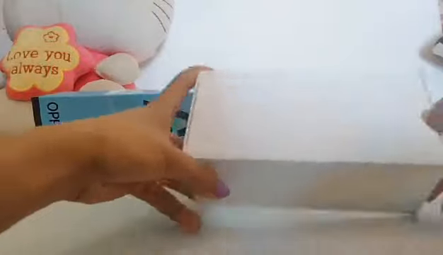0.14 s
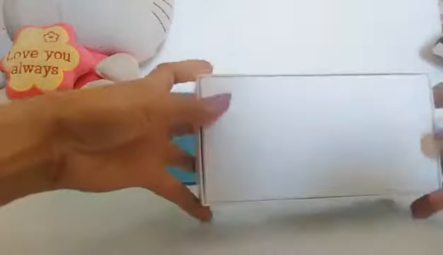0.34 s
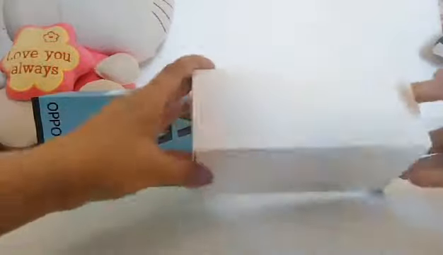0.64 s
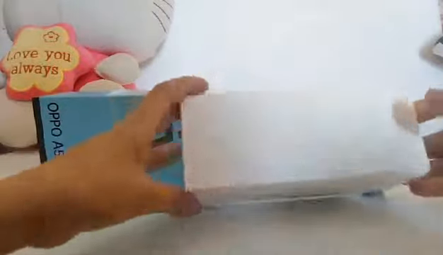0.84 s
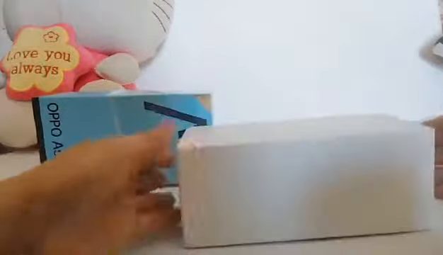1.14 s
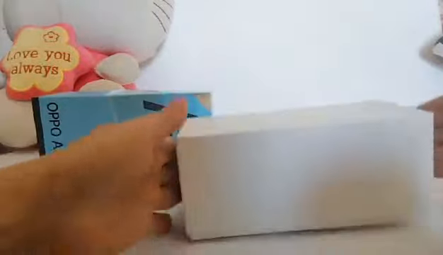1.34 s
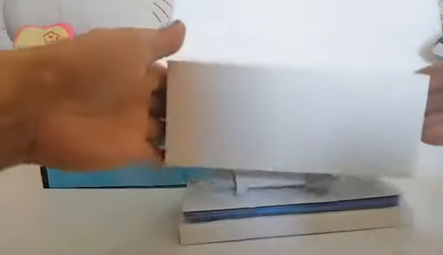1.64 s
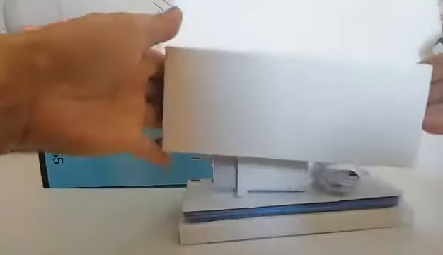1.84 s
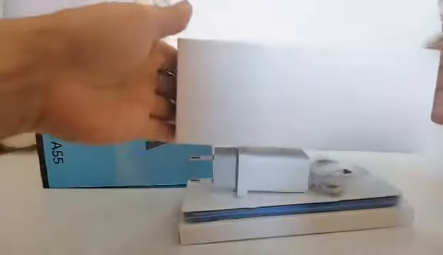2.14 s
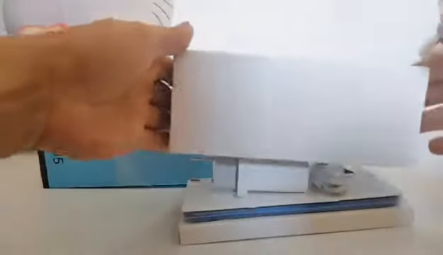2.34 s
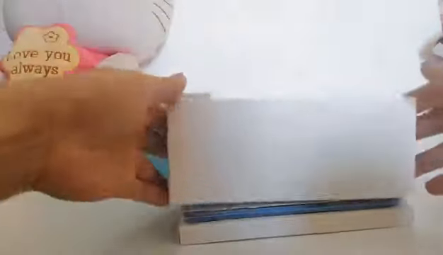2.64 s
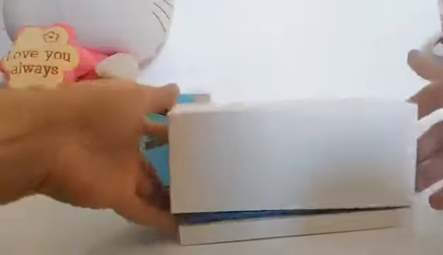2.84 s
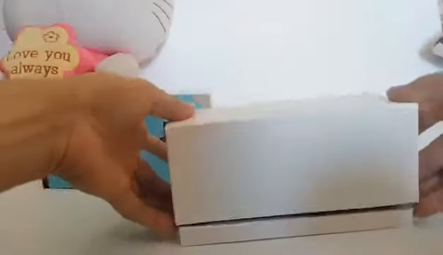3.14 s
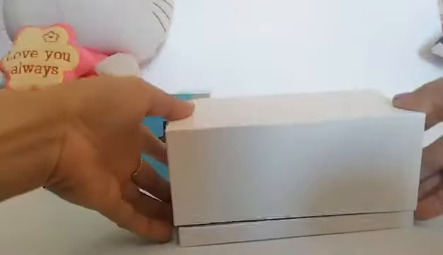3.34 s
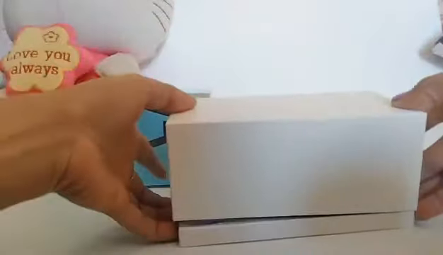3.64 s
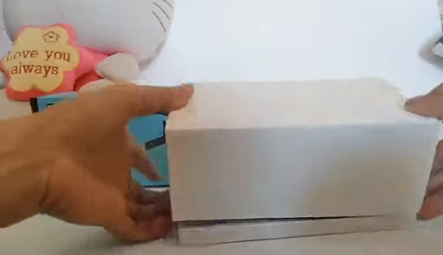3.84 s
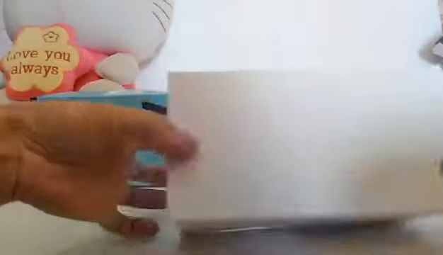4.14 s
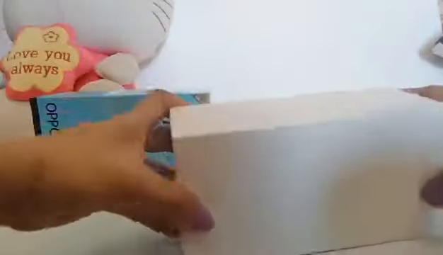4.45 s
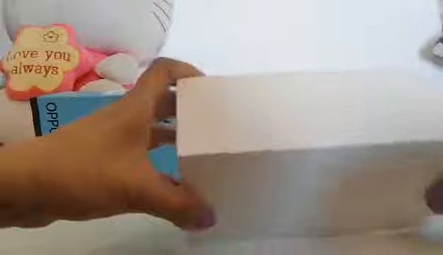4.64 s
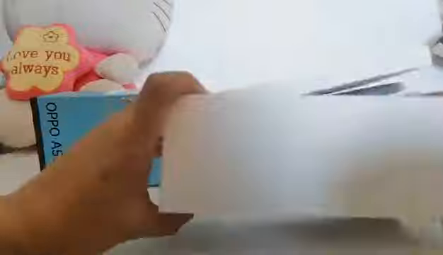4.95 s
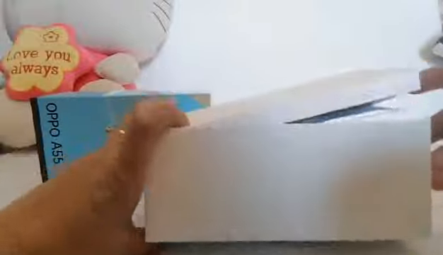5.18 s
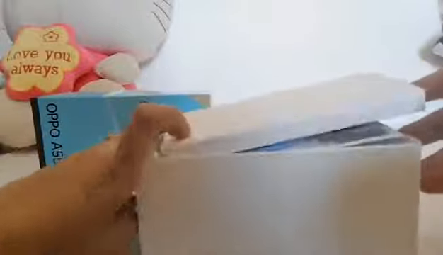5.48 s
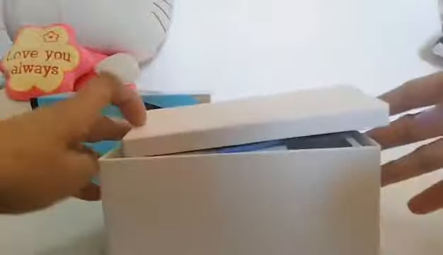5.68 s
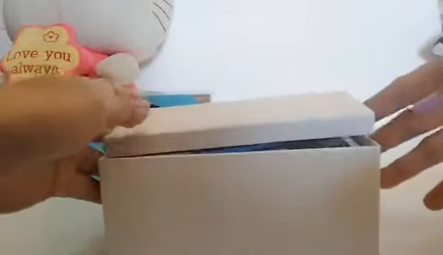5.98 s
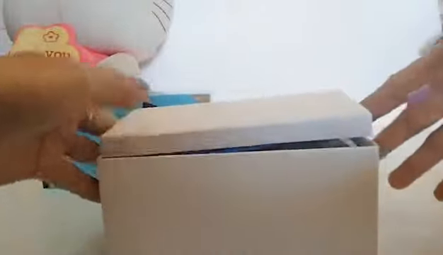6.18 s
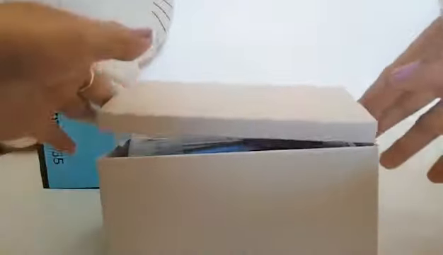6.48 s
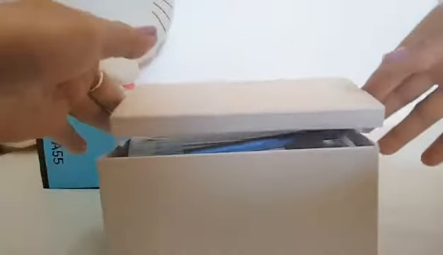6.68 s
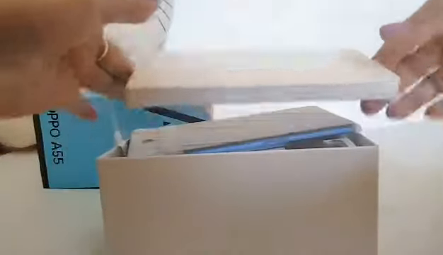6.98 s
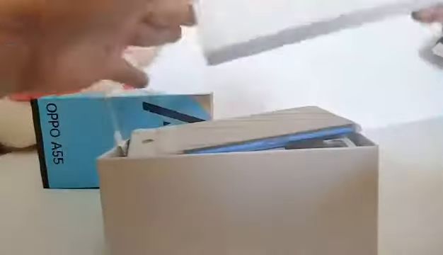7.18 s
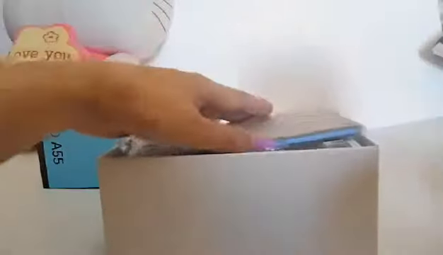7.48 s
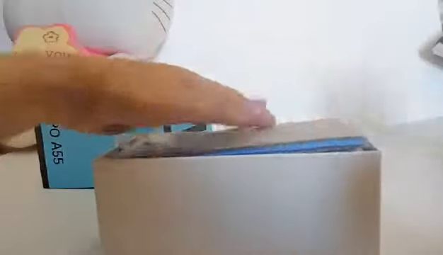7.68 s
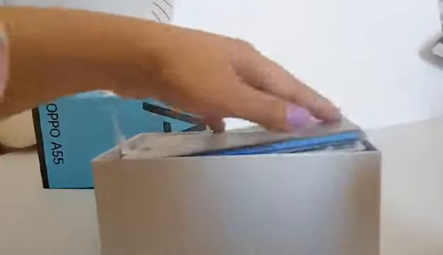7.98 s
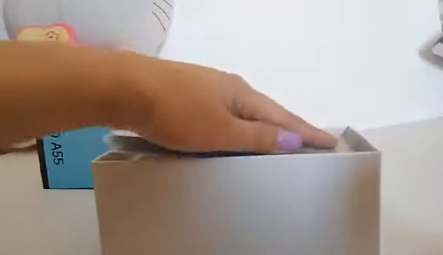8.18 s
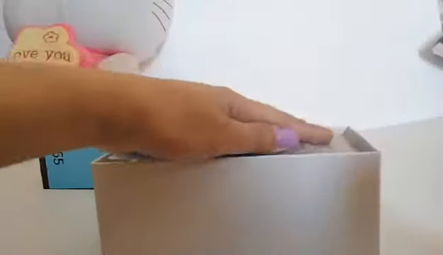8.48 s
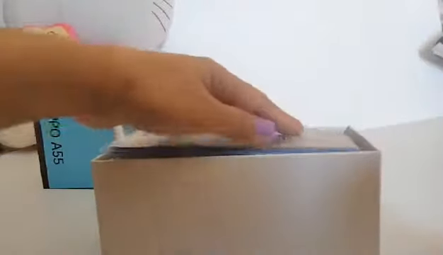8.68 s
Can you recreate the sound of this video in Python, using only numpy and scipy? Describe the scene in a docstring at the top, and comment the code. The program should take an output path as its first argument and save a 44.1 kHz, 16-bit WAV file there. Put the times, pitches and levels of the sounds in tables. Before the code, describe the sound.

Close to the microphone, hands turn a cardboard box over on a table. Fingers rub and card scrapes between hollow knocks and small bumps from the contents. The handling grows busier in the middle, with sharp clicks and taps, then eases into softer sliding and the hiss of plastic wrap. A last cluster of clicks and light knocks follows, over quiet room noise and a very faint distant engine.

```python
"""Hands turn, open and close a cardboard box on a table, close to a phone with two microphone ports.
The box knocks on the table and its contents bump inside; fingers, card and plastic wrap rub and hiss.
A quiet room lies under it, and faint hums come and go, and a far engine drones towards the end."""
import sys
import numpy as np
from scipy import signal
from scipy.fft import rfft, irfft, next_fast_len
from scipy.io import wavfile
from scipy.ndimage import uniform_filter1d

SR = 44100
rng = np.random.default_rng(int(sys.argv[2]) if len(sys.argv) > 2 else 0)


def pcm_store(signal):
    """Save signal as 16-bit PCM."""
    levels = np.round(np.clip(np.atleast_2d(signal), -1, 1) * 32767)
    wavfile.write(sys.argv[1], SR, levels.astype(np.int16).T)


N = 388962

# knocks: (s, blow dB, hollow pitch Hz, table thump dB, panels and edges dB, t60 s), parts relative to the blow
KNOCKS = [(0.346, -38, 195, -31, -3.5, 0.024), (0.557, -25, 214, -14, -8, 0.041), (0.815, -24.5, 210, -12, -11, 0.024),
          (0.859, -42, 181, -21, -14, 0.057), (0.979, -20.5, 316, -5, 6, 0.02), (0.989, -29, 330, -10, 4, 0.025), (0.997, -20, 346, -4.5, -18, 0.024),
          (1.2, -46.5, 480, -28, -1, 0.054), (1.431, -40, 345, -20.5, 8.5, 0.054), (1.472, -30, 178, -5, 3, 0.024),
          (1.49, -14.5, 251, -4, -2, 0.011), (1.495, -15, 258, -5.5, -0.5, 0.018), (1.501, -25, 310, -19.5, -9, 0.019),
          (1.507, -23, 240, -11, -13, 0.026), (2.591, -34, 324, -14, 4, 0.051), (2.647, -40, 367, -25, 4.5, 0.031),
          (2.663, -33, 377, -50, 10, 0.076), (2.669, -29, 361, -47, 2, 0.06), (2.675, -30, 380, -31, -3, 0.035),
          (2.682, -33, 360, -42, -12, 0.044), (2.859, -21, 345, -17, -3, 0.028),
          (2.884, -30, 420, -21, -2, 0.069), (2.907, -35, 380, -20, -6, 0.027), (2.919, -39.5, 386, -8, 12.5, 0.028), (2.948, -35.5, 367, -8, 0, 0.045),
          (2.974, -42.5, 374, -22, 2, 0.056), (3.21, -31.5, 363, -15, -4, 0.027), (3.339, -49.5, 385, -13, 0.5, 0.035), (3.442, -50, 325, -6, -1, 0.025),
          (3.59, -32.5, 340, -16, -8, 0.028), (3.768, -44, 297, -20, -7, 0.037), (3.784, -36.5, 357, -13, 0.5, 0.011), (3.906, -41, 393, -28, -0.5, 0.023),
          (3.967, -43.5, 321, -12, -1.5, 0.11), (4.1, -38, 470, -27, 13, 0.074), (4.235, -26, 350, -26, 1, 0.053), (4.245, -27, 366, -27, 3.5, 0.046),
          (4.251, -34, 407, -6, 4, 0.047), (4.267, -26.5, 471, -3, 2, 0.098), (4.297, -34.5, 397, -25, 0, 0.02), (4.329, -19, 440, -9, -3.5, 0.016),
          (4.398, -21, 338, -17, -7.5, 0.016), (4.69, -20, 462, -46, 0.5, 0.035), (4.733, -17, 440, -53, -5.5, 0.026), (4.737, -12.5, 404, -48, -6.5, 0.02),
          (4.926, -52, 520, -21, 17, 0.04), (4.944, -56, 500, -21, 15, 0.04), (5.147, -48.5, 350, -18, 7, 0.028), (5.279, -18.5, 380, -7, -4.5, 0.027),
          (5.346, -19, 370, -15, -2.5, 0.015), (5.447, -51, 410, -18, 25.5, 0.049), (5.696, -39, 349, -7, -4.5, 0.037),
          (5.767, -44, 342, -31, 2, 0.03), (5.824, -46, 388, -27, -8, 0.036), (5.958, -45.5, 316, -11, 8, .04),
          (7.084, -51, 320, -18, 15, 0.052), (7.368, -42, 239, -15, -7, 0.058), (7.587, -51, 420, 0, -7, 0.051),
          (7.495, -46, 340, -20, -3, 0.05), (8.102, -42.5, 208, -21, 14, 0.02), (8.522, -31, 435, -30, 1, 0.036),
          (8.538, -42.5, 414, -35, 6, 0.031), (8.569, -35, 517, -36, -3, 0.073), (8.582, -41.5, 510, -36, -2, 0.05),
          (8.597, -36, 245, -32, -14, 0.04), (8.609, -40.5, 240, -35, -10, 0.048)]
# upper panels of the box: (Hz, dB, t60 s)
PANELS = [(520, -2, 0.02), (734, 2, 0.022), (866, 6, 0.034), (958, 7, 0.034), (1040, -0.5, 0.023), (1350, 2, 0.02),
          (1547, -4, 0.018), (1875, 2, 0.018), (2010, -4.5, 0.015), (2400, -2, 0.0092)]
TABLE = [(64, -19.5, .09), (93, 0.5, 0.095), (143.7, -5, 0.057), (169.5, -3.5, 0.076)]  # table top: (Hz, dB, t60 s)
DRAG = [(35, -35.5), (65, -8), (273, -3.5), (366, 2), (540, -3), (660, -6.5), (732, -5.5), (1130, -7), (1410, -16),
        (2500, -20), (3250, -77.5), (5500, -120)]  # (Hz, dB per Hz)
SCRAPE = [(700, -55.5), (1300, 6.5), (2500, 5.5), (4000, 4.5), (5500, -1), (8000, -6)]  # (Hz, dB per Hz)
HISS = [(3000, -23), (4500, -15.5), (5400, -7.5), (7000, -4.5), (8900, 2.5), (10200, -5.5), (11300, -15.5), (12600, -11), (13500, -27.5)]  # (Hz, dB per Hz)
CRACK = [(1180, -13.5), (2000, 9.5), (2780, 8), (3580, 4.5), (5560, -5.5), (7590, 3.5), (8770, -30), (13500, -79)]  # (Hz, dB per Hz)
AIR, AIR_DB = [(25, -21), (50, 11.5), (80, -12), (150, 6.5), (220, -5), (380, -1), (520, -8), (1050, -12.5), (1500, -21), (5000, -40.5), (9000, -30), (13500, -33.5)], -67.5  # (Hz, dB per Hz)
# far engine: (s, second order Hz, its level dB); orders as (multiple of the firing rate, dB)
ENGINE = [(6.9, 139.8, -74.5), (7.306, 137.8, -67), (7.594, 143.9, -59), (7.742, 139.0, -71.5), (8.007, 141.3, -54.5),
          (8.08, 143.1, -63), (8.108, 143.4, -60), (8.166, 141.7, -73.5), (8.386, 142.7, -67.5), (8.766, 138.3, -66),
          (8.82, 137.8, -67)]
ORDERS = [(1, -13), (2, 0), (3, -14), (4, -5), (5, 0), (6, -11), (8, -14)]  # fixed
SAME = [(60, 0.89), (250, 0.91), (500, 0.86), (1000, 0.33), (2250, 0.26), (5500, .2)]  # (Hz, likeness of the two ports)
LEAN = [(60, 0.7), (250, 1), (1000, -0.6), (2000, -1), (4000, -5.5), (8000, -16), (13000, -26)]  # (Hz, left minus right dB)
LEAD = [(60, 0), (250, .05), (500, -.2), (1000, -.5), (2000, -.9), (4700, -2), (9000, -4)]  # (Hz, radians by which left leads)  # fixed
EDGE_HZ = 13200  # fixed
T = np.arange(N) / SR
# snaps of wrap, nails and card edges: (s, peak dB, top above 6 kHz dB, ring Hz)
SNAPS = [(0.2958, -35.5, -5, 3640), (0.9813, -28.5, 0.5, 1530), (1.2035, -47, -6, 5030), (1.266, -35, 6, 3500), (1.414, -32, -15, 1500),
         (1.4385, -35, -1, 2500), (1.4613, -29, 6, 3480), (1.4935, -21, -2, 2500), (1.5697, -44, 8, 5500),
         (1.5804, -34, 3, 4940), (1.9717, -60, 5, 5470), (2.5919, -42, -9, 2000), (2.6523, -42, -15, 2500),
         (2.666, -32, -20, 1880), (2.8598, -27, -7, 1900), (2.897, -41, -8, 2800), (2.9202, -26, -2, 2420),
         (3.168, -29, -10, 4470), (3.786, -28, -18, 2020), (3.908, -45.5, -5, 1590), (3.9708, -37, -2, 2300),
         (4.101, -19, 0, 3300), (4.2352, -25, -6, 2500), (4.2995, -23.5, -8, 4940), (4.332, -31, -14, 2200),
         (4.3994, -33.5, -16, 2520), (4.4424, -42, 8, 5500), (4.69, -14, -5, 2800), (4.735, -20, 0, 2720),
         (5.1853, -44.5, -2, 4500), (5.2801, -31, -11, 2020), (5.2895, -34, -18, 3500), (5.4088, -40, -7, 3270),
         (5.4497, -26.5, -5, 3040), (5.768, -48, -4, 2500), (5.9523, -44, 0, 3500), (7.0206, -26, -25, 1050),
         (7.0908, -33.5, -10, 1960), (7.509, -45, -4, 5000), (7.591, -41, 7, 5000), (7.6705, -41, 1, 2650),
         (8.102, -32, -11, 2200), (8.4573, -25, -12, 4700), (8.4978, -25, 0, 2520), (8.511, -40, -2, 5000),
         (8.5252, -32.5, 3.5, 3540), (8.5681, -22, -8, 3220), (8.5793, -32, -10, 3500), (8.5966, -30, -10, 1870)]
# hums that come and go outside: (start s, end s, Hz, dB)
HUMS = [(1.85, 2.3, 455, -72), (1.8, 2.5, 120, -75), (6.15, 7.0, 79, -71)]  # fixed
SELF_NOISE, SELF_NOISE_DB = [(500, -7), (2500, 1), (8000, -4.5), (13000, -16)], -78  # each microphone's own hiss: (Hz, dB per Hz)
# strokes of hands, card and wrap: (peak s, rise s, fall s, scrape of card edges dB, drag that shakes the box dB,
# hiss of skin and wrap dB); rise and fall are the times for 20 dB
STROKES = [(0.089, 0.42, 0.069, -59.5, -46.5, -55.5), (0.18, 0.042, 0.085, -69, -64, -54), (0.283, 0.11, 0.083, -55.5, -48.5, -52.5), (0.448, 0.17, 0.14, -67, -55.5, -53),
           (0.568, 0.05, 0.11, -62.5, -49, -56), (0.68, 0.097, 0.18, -64, -55.5, -79), (0.8, 0.078, 0.27, -69, -66, -57), (0.87, 0.061, 0.13, -50.5, -42, -55.5),
           (0.989, 0.03, 0.046, -53, -35.5, -38.5), (1.08, 0.122, 0.075, -70, -56.5, -59.5), (1.2, .03, 0.079, -66, -66, -72.5), (1.272, 0.015, 0.48, -45.5, -52, -52.5),
           (1.399, 0.26, 0.22, -55.5, -42.5, -56.5), (1.497, 0.049, 0.099, -37.5, -37, -31),
           (1.66, .06, .04, -62, -62, -56), (1.738, 0.12, 0.012, -60, -61.5, -56), (1.99, 0.049, 0.14, -90, -63.5, -79), (2.601, 0.01, 0.21, -69, -56, -57),
           (2.667, 0.015, 0.028, -63, -35.5, -62.5), (2.799, 0.015, 0.19, -63.5, -76.5, -58.5), (2.87, 0.043, 0.15, -50, -39.5, -65),
           (2.932, 0.026, 0.07, -45.5, -38.5, -43.5), (3.07, 0.043, 0.035, -61, -55, -56), (3.209, 0.1, 0.063, -55, -51, -52.5),
           (3.34, 0.059, 0.037, -69, -63, -68), (3.44, 0.042, 0.066, -66, -63, -67), (3.642, 0.16, 0.1, -59.5, -50, -55.5),
           (3.777, 0.012, 0.13, -62, -55.5, -64), (3.982, 0.053, 0.056, -48.5, -48, -48.5), (4.091, 0.13, 0.44, -51, -52, -46.5),
           (4.263, 0.063, 0.098, -34.5, -29, -37), (4.38, 0.072, 0.15, -70, -48.5, -54),
           (4.563, 0.093, 0.18, -56, -57, -47), (4.66, 0.16, 0.059, -54, -46, -71), (4.699, 0.034, 0.19, -48.5, -46, -63),
           (4.736, 0.038, 0.063, -38.5, -36, -40), (4.942, 0.077, 0.057, -55, -48.5, -53.5), (5.077, 0.033, 0.094, -66, -55, -84),
           (5.17, 0.091, 0.29, -55.5, -56, -54.5), (5.29, 0.028, 0.15, -48, -41, -52), (5.361, 0.035, 0.089, -52, -40.5, -44),
           (5.59, 0.44, 0.16, -54.5, -52, -49.5), (5.82, 0.77, 0.27, -66, -58, -71), (5.97, 0.1, 0.076, -53, -51.5, -44.5), (6.19, 0.16, 0.061, -60.5, -57.5, -59),
           (6.38, 0.22, 0.093, -69, -60, -69.5), (6.59, 0.35, 0.14, -72, -63.5, -75), (7.019, 0.018, 0.39, -57, -66.5, -64),
           (7.092, 0.071, 0.039, -51.5, -55, -49.5), (7.19, 0.1, 0.073, -61, -55, -55.5), (7.329, 0.039, 0.086, -61, -54, -50),
           (7.45, 0.093, 0.44, -55.5, -50.5, -50.5), (7.61, 0.077, 0.073, -52, -49, -46), (7.819, 0.044, 0.1, -54, -49.5, -58),
           (8.07, 0.32, 0.028, -58, -51.5, -59.5), (8.112, 0.038, 0.035, -44, -42, -43.5), (8.44, 0.25, 0.023, -68, -65, -65.5),
           (8.51, 0.025, 0.28, -62, -49, -67), (8.59, 0.075, 0.088, -46, -42.5, -45), (8.682, 0.048, 0.14, -53, -50.5, -61),
           (8.768, 0.2, 0.077, -58.5, -73, -45.5)]
SETTLE_DB, SETTLE_S = -28, 0.19  # after a stroke things settle: start below the peak, time for 20 dB
REST_DB = (-85, -72, -81.5)  # hands at rest: scrape, drag, hiss
SNAP_RISE_MS = 1
CONTACT_SHARE, LOOSE_PER_S = 0.093, 16.6  # soft blows ring long: contact time as a share of t60, trailing contacts per s of t60
RATTLE_DB, MUFFLE_DB_PER_S = -5, -150  # edges relative to panels; soft blows rattle them less
PRESS = 0.63  # how flat the top of a stroke is
GRIP_SHIFT = 0.071  # the grip bends the panels: spread of their pitch from blow to blow
# the hands work now left, now right of the phone: (s, left minus right dB)
PLACE = [(0.0, -2.0), (0.42, -1.5), (0.49, -9), (0.61, -3), (8.72, -2.5), (8.82, -12)]
SNAP_RING_DB, SNAP_T60_S, SNAP_UPPER = -7, 0.006, 2.2  # the ring: level, decay, ratio of its upper mode
CREAK = (7.805, 7.855, 405, -46)  # a brief creak of card under the palm: (start s, end s, slips per s, dB)
CREAK_ORDERS = [(1, 0), (2, -1), (3, -14), (4, -12), (5, -11)]  # (multiple of the slip rate, dB)


def gain_of(db):
    return 10 ** (np.asarray(db) / 20)


def evened(x):
    return x / np.sqrt(np.mean(x ** 2) + 1e-20)


def read(points, hz):
    f, value = np.transpose(points)
    return np.interp(np.log(hz + 1), np.log(f + 1), value)


def colour(x, points):
    """Shapes a sound by a spectrum, to rms 1."""
    n = x.shape[-1]
    return evened(irfft(rfft(x) * gain_of(read(points, np.fft.rfftfreq(n, 1 / SR))), n))


def add(mix, s, sound):
    part = mix[:, round(s * SR):][:, :sound.shape[1]]
    part += sound[:, :part.shape[1]]


def ring(modes, t, draw, spread):
    """Dying modes; each blow lands elsewhere, so it detunes and weighs them anew."""
    hz, db, t60 = np.transpose(modes)[:, :, None]
    detune, weight_db = 1 + spread * draw[0, :len(hz), None], 4 * draw[1, :len(hz), None]  # fixed
    return (gain_of(db + weight_db - 60 * t / t60) * np.sin(2 * np.pi * hz * detune * t)).sum(0)


def grit(per_s, spread_db, ms):
    """Two noises under one uneven pressure: sparse catches of random size, each a short puff."""
    catches = gain_of(spread_db * np.minimum(rng.exponential(1, N), 3)) * (rng.random(N) < per_s / SR)
    keep = np.exp(-1000 / (ms * SR))
    power = evened(signal.filtfilt([1], [1, -keep], catches ** 2))
    return np.sqrt(0.69 + power) * rng.standard_normal((2, N))


def knock(db, hz, thump_db, panel_db, t60, draw, noise):
    """The hollow box rings briefly, with the table under it; scattered contacts shake its panels and edges."""
    t = np.arange(noise.shape[1]) / SR
    u = t / (CONTACT_SHARE * t60)
    # one quick push and rebound, then small contacts that trail it when the card lands loosely
    v = np.maximum(t - .002, 0) / 0.00014
    landing = v * (v - 2) * np.exp(-v)
    trail = noise * (1 - np.exp(-u)) * (np.exp(-u / 2) + 0.23 * gain_of(-60 * t / (t60 * 0.6)))
    push = 0.78 * landing / np.linalg.norm(landing) + LOOSE_PER_S * t60 * trail / np.linalg.norm(trail[0])
    hollow = struck(ring([(hz, 0, t60), (hz * 1.3, -4.5, t60 * 0.41), (hz * 0.33, -26, t60 * 0.73)], t, 0.2 * draw, 0.047), push)
    thump = struck(ring(TABLE, t, draw[:, 3:], .06), np.hanning(300)[None])  # fixed
    bent = np.array(PANELS) * [np.exp(GRIP_SHIFT * draw[0, -1]), 1, 1]
    panels = struck(ring(bent, t, draw[:, 6:], 0.06), push)
    rattle = colour(trail, CRACK)
    rattle /= abs(rattle).max()
    return gain_of(db) * (hollow + gain_of(thump_db) * thump + gain_of(panel_db) * (panels + gain_of(RATTLE_DB + MUFFLE_DB_PER_S * t60) * rattle))


def room(x):
    """Sparse echoes of random sign, other ones on each path, dying within a fifth of a second."""
    count = 700
    at = np.arange(count) * 20 + 60 + rng.integers(0, 20, (2, count))
    taps = np.zeros((2, count * 20 + 80))
    np.put_along_axis(taps, at, rng.choice([-1., 1.], at.shape) * gain_of(-60 * at / SR / 0.21), 1)
    return signal.fftconvolve(x, taps / np.linalg.norm(taps[0]), axes=1)[:, :N]


def knocks():
    """Every knock with its echoes, and the snaps."""
    out, snaps = np.zeros((2, 2, N))
    for s, *row in KNOCKS:
        add(out, s, knock(*row, rng.standard_normal((2, 17)), rng.standard_normal((2, 8192))))
    for s, *row in SNAPS:
        add(snaps, s - .001, snap(*row, rng.standard_normal((2, 2048))))
    out = signal.sosfilt(signal.butter(2, 65., "high", fs=SR, output="sos"), out)  # the knocks carry no deep bass
    return out + snaps + gain_of(-5.5) * room(out + 0.15 * snaps)


def rubbing():
    """Friction catches and slips: it scrapes, shakes the box and hisses; each stroke swells, fades and settles."""
    peak, rise, fall, *levels = np.transpose(STROKES)[:, :, None]
    t = T[::64]
    after = np.maximum(t - peak, 0)
    shape = gain_of(-20 * np.maximum(peak - t, 0) / abs(rise)) * np.hypot(
        gain_of(-20 * after / abs(fall)), gain_of(SETTLE_DB - 20 * after / SETTLE_S))
    shape = np.tanh(PRESS * shape) / np.tanh(PRESS)
    scrape = patchy(colour(grit(160, 6.8, 0.79), SCRAPE), 4.4, size=(3, 10))
    drag = patchy(colour(grit(90, 6.0, 11.0), DRAG), 2.8, size=(4, 4))  # fixed
    hiss = patchy(colour(grit(160, 7.0, 2.0), HISS), 4.5, size=(2, 14))  # fixed
    gains = [np.hypot(np.linalg.norm(gain_of(db) * shape, axis=0), gain_of(rest)) for db, rest in zip(levels, REST_DB)]
    return sum(np.interp(T, t, g) * x for g, x in zip(gains, (scrape, drag, hiss)))


def air():
    """Steady room noise that swells a little."""
    swell = evened(uniform_filter1d(uniform_filter1d(rng.standard_normal(N), 3000), 3000))
    return gain_of(AIR_DB + 0.41 * swell) * colour(rng.standard_normal((2, N)), AIR)


def engine():
    """Low orders of a slow firing rate, each wavering on its own."""
    s, hz, db = np.transpose(ENGINE)
    turns = np.cumsum(np.interp(T, s, hz) / 2) / SR
    waver = 3.2 * rng.standard_normal((len(ORDERS), N // 4096 + 2))  # dB
    tones = sum(gain_of(d + np.interp(T, np.arange(len(w)) * 4096 / SR, w)) * np.sin(2 * np.pi * k * turns + k * k)
                for (k, d), w in zip(ORDERS, waver))
    fade_in = np.clip((T - 6.6) / 0.32, 0, 1)
    return np.sqrt(2) * gain_of(np.interp(T, s, db)) * fade_in * tones * np.ones((2, 1))


def struck(x, push):
    """A ring excited by an uneven push; peak 1."""
    x = signal.fftconvolve(x[None], push, axes=1)[:, :len(x)]
    return x / abs(x).max()


def patchy(x, db, size):
    """Patches of the spectrum swell and fade."""
    z = signal.stft(x, nperseg=256)[2]
    field = uniform_filter1d(uniform_filter1d(rng.standard_normal(z.shape[1:]), size[0], 0), size[1], 1)
    return evened(signal.istft(z * gain_of(db * evened(field)), nperseg=256)[1][:, :N])


def snap(db, top_db, hz, noise):
    """A sharp dry click: a hard tick inside a millisecond or two of crackle, with a short ring."""
    t = np.arange(noise.shape[1]) / SR
    u = (t * 1000 - 1) / SNAP_RISE_MS
    late = np.maximum(u, 0)
    burst = noise * np.exp(np.minimum(u, 0) / .4) * (np.exp(-late / .5) + .5 * np.exp(-late / 2.2) + .02 * np.exp(-late / 6))  # fixed
    burst = burst + 1.4 * (np.arange(len(t)) == np.argmax(u >= 0))  # fixed
    low = colour(burst, [(700, -32.5), (1800, -12.0), (4500, -10.0), (7000, -14.0), (14000, -38)])
    top = colour(burst, [(3000, -40), (6000, -12), (9000, 0), (10500, -9), (13000, -20)])  # fixed
    modes = (np.sin(2 * np.pi * hz * t) + 0.54 * np.sin(2 * np.pi * hz * SNAP_UPPER * t)) * gain_of(-60 * t / SNAP_T60_S)
    return gain_of(db) * (low / abs(low).max() + gain_of(top_db) * top / abs(top).max()
                          + gain_of(SNAP_RING_DB) * struck(modes, burst))


def hums():
    """Faint tones that swell and fade."""
    tones = sum(gain_of(db) * np.sin(np.pi * np.clip((T - a) / (b - a), 0, 1)) * np.sin(2 * np.pi * hz * T)
                for a, b, hz, db in HUMS)
    return np.sqrt(2) * tones


def creak():
    """Quick, slightly uneven slips sound as a rough little stack of tones."""
    start, end, hz, db = CREAK
    wobble = evened(uniform_filter1d(rng.standard_normal(N), 150))
    turns = np.cumsum(hz * (1 + .09 * wobble)) / SR
    swell = np.sin(np.pi * np.clip((T - start) / (end - start), 0, 1)) ** .7
    return gain_of(db) * swell * sum(gain_of(d) * np.sin(2 * np.pi * k * turns) for k, d in CREAK_ORDERS)


def scene():
    """Two paths of sound reach the ports: alike in the bass, less so above; the left port is dull."""
    n = next_fast_len(N + 4096)
    hz = np.fft.rfftfreq(n, 1 / SR)
    a, b = rfft(knocks() + rubbing() + air() + engine() + creak() + hums(), n)
    same, lean = np.clip(read(SAME, hz), 0, 1), gain_of(read(LEAN, hz))
    left = (same * a + np.sqrt(1 - same ** 2) * b) * np.exp(1j * read(LEAD, hz)) * lean
    place = gain_of(np.interp(T, *np.transpose(PLACE)) * [[.5], [-.5]])
    return irfft(np.array([left, a]) * 2 / (1 + lean), n)[:, :N] * place


def record(dry):
    """The microphones lose the deep bass and add their own faint hiss; then the band limit."""
    thin = signal.sosfilt(signal.butter(3, 58., "high", fs=SR, output="sos"), dry)  # fixed
    hissing = thin + gain_of(SELF_NOISE_DB) * colour(rng.standard_normal(dry.shape), SELF_NOISE)
    return signal.oaconvolve(hissing, signal.firwin(511, EDGE_HZ, window=("kaiser", 9), fs=SR)[None], "same")


dry = scene()
out = record(dry)
pcm_store(out)
```